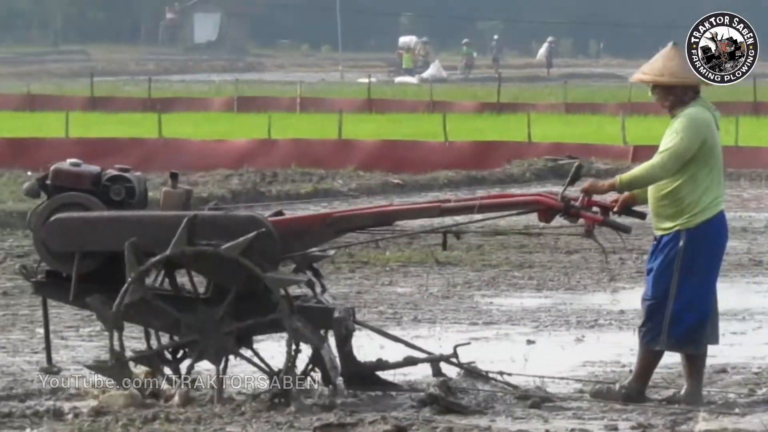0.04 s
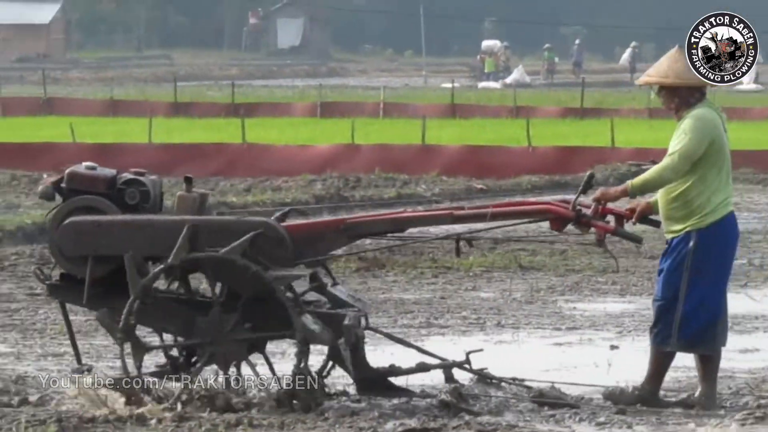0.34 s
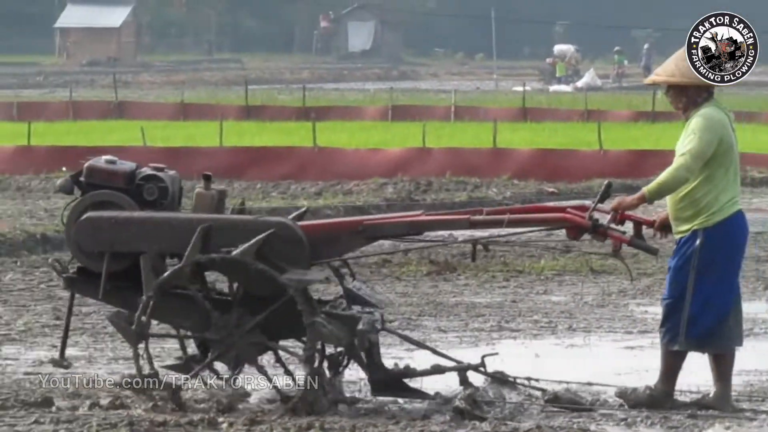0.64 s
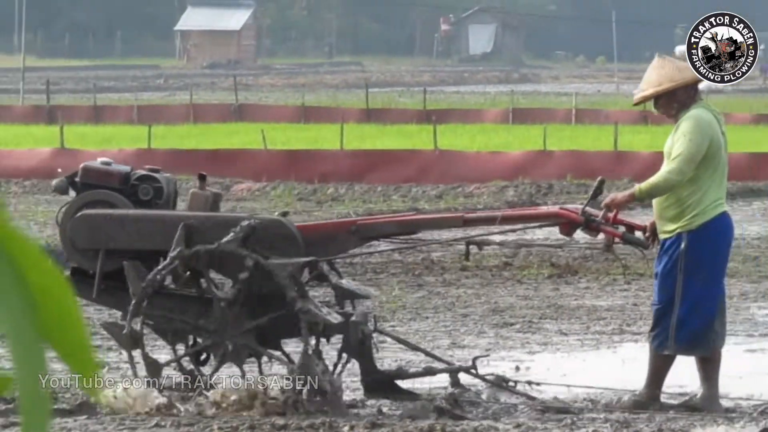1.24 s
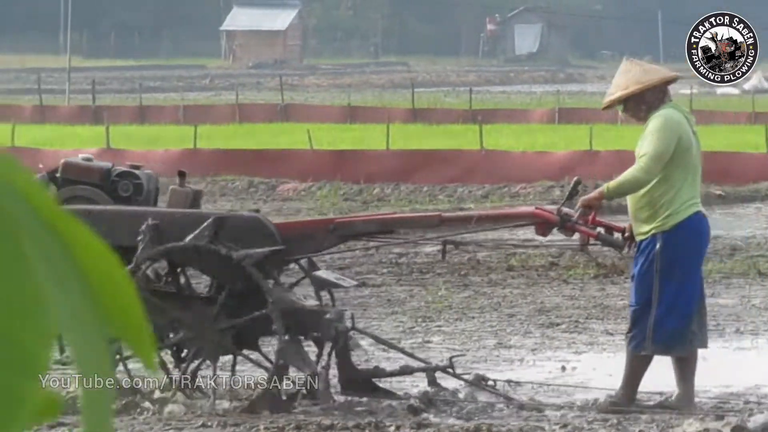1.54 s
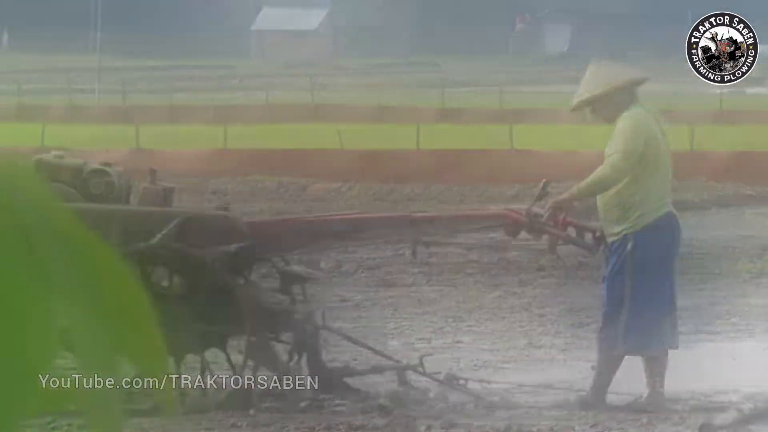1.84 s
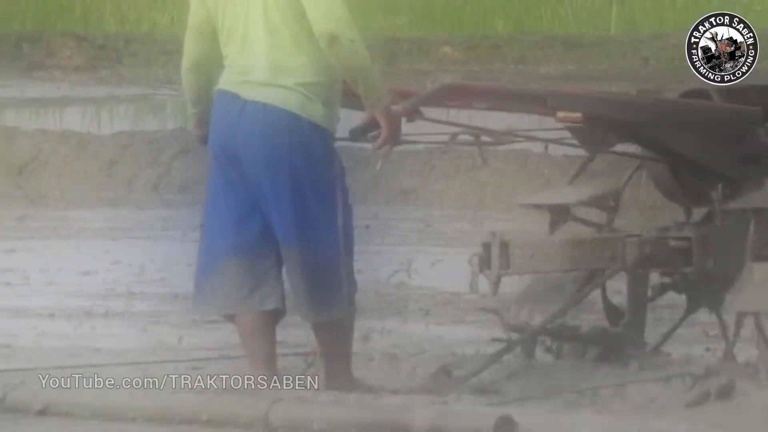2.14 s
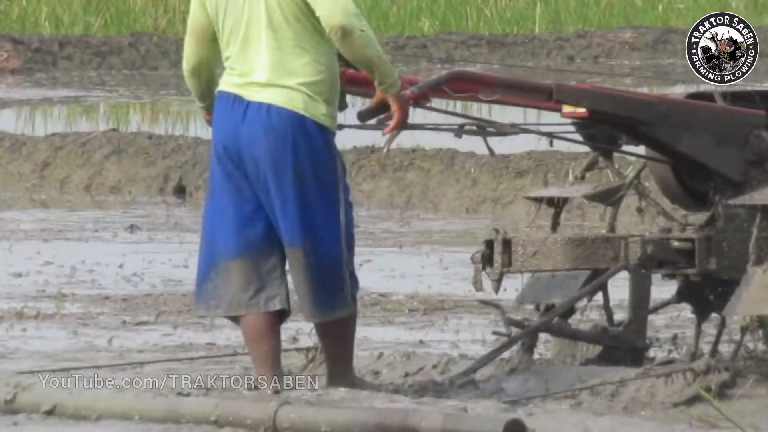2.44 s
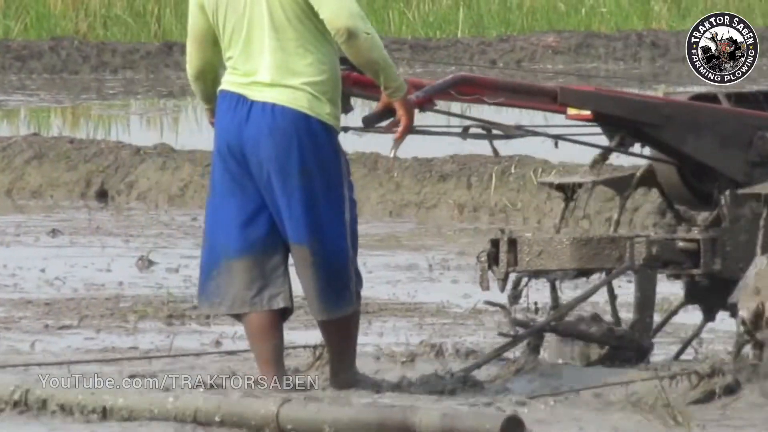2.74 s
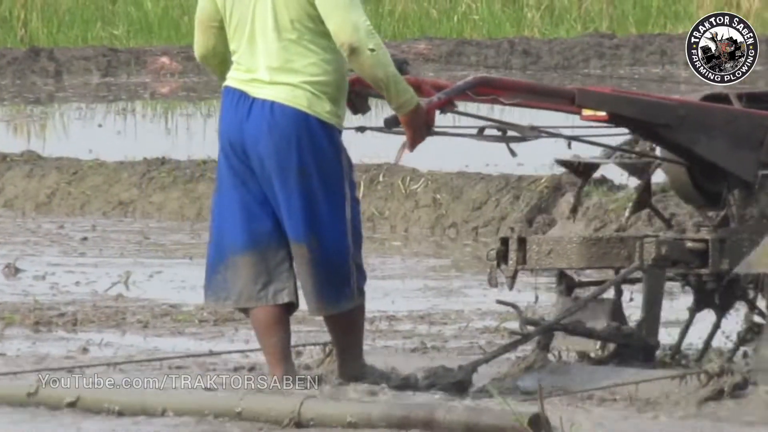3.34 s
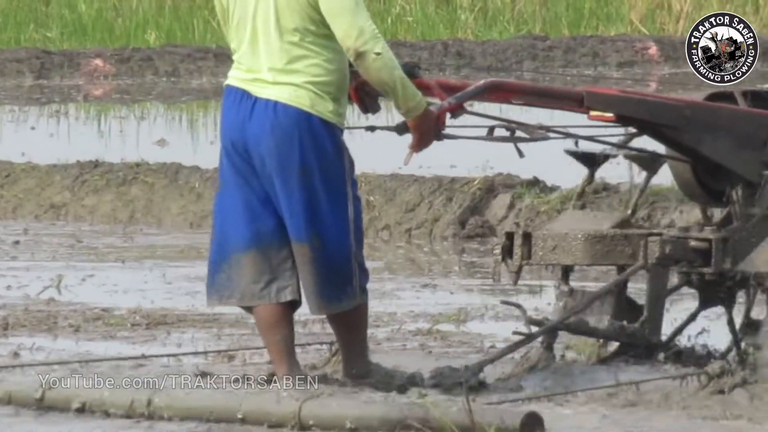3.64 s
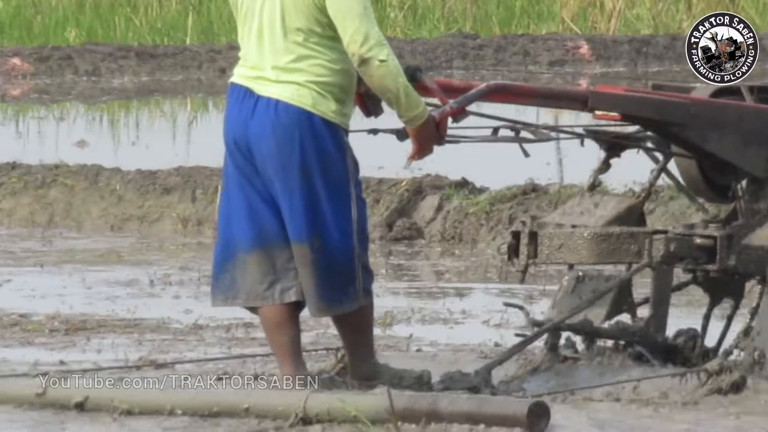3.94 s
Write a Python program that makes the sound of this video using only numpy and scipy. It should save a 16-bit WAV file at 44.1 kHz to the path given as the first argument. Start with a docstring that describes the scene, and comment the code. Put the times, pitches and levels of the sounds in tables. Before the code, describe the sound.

A single-cylinder diesel walking tractor chugs and rattles in a wet field while a motorbike fades away. After a short silence it resumes, heard from behind, with faint mud spatters, metal ticks and another motorbike approaching far off.

```python
"""Flooded field: a single-cylinder diesel walking tractor ploughs, heard from the side, then from behind
after a short silence. Each engine cycle brings the same exhaust thumps and metal knocks over rattling
gears; from behind, mud spatters off the wheels and metal ticks. A faster engine, probably a motorbike,
recedes at the start; another draws near at the end."""
import sys
import numpy as np
from scipy import signal
from scipy.fft import rfft, irfft
from scipy.io import wavfile
from scipy.ndimage import uniform_filter1d

SR = 44100
rng = np.random.default_rng(int(sys.argv[2]) if len(sys.argv) > 2 else 0)


def generate_wav(signal):
    """Clip the signal to [-1, 1] and save it as 16-bit WAV at the path in sys.argv[1]."""
    frames = np.transpose(np.atleast_2d(signal))
    scaled = np.clip(frames, -1, 1) * 32767
    pcm = np.round(scaled).astype(np.int16)
    wavfile.write(sys.argv[1], SR, pcm)


N = 176400

FIRING_HZ = 11.93
KNOCK_RISE_MS, PUFF_RISE_MS = .3, 1.2
# engine block spectrum from behind (frequency [Hz], gain [dB])
REAR_BLOCK_SPECTRUM = [(100, -15), (400, 2.5), (670, 11.5), (800, 8.5), (1320, 2), (1700, -15.5),
                       (2400, -4.5), (2520, 3), (2750, -2), (3050, -2.5), (3280, -2.5), (3550, 0),
                       (4250, -10.5), (4600, -2.5), (5550, -14), (6050, -11), (7000, -20.5), (10500, -18),
                       (15000, -38)]


def undb(db):
    return 10 ** (np.asarray(db) / 20)


def unit(x):
    """Scale to rms 1."""
    return x / np.sqrt(np.mean(x ** 2) + 1e-18)


def curves(table):
    """Each value column of a time table, per sample."""
    rows = np.array(table, float)
    return [np.interp(np.arange(N) / SR, rows[:, 0], col) for col in rows.T[1:]]


def noise():
    return rng.standard_normal(N)


def walk(rate_hz):
    """Random steps at rate_hz, smoothed twice; rms 1."""
    hold = max(int(SR / rate_hz), 2)
    steps = np.repeat(noise()[:N // hold + 1], hold)
    return unit(uniform_filter1d(uniform_filter1d(steps, hold), hold)[:N])


def colour(x, spectrum):
    """Minimum-phase filter through (frequency [Hz], gain [dB]) points; rms 1."""
    hz, db = np.array(spectrum, float).T
    size = 2 * N
    bins_hz = np.maximum(np.arange(N + 1) * SR / size, 1)
    gain = undb(np.interp(np.log(bins_hz), np.log(hz), db))
    cepstrum = irfft(np.log(gain))
    cepstrum[1:N] *= 2
    cepstrum[N + 1:] = 0
    return unit(irfft(rfft(x, size) * np.exp(rfft(cepstrum)))[:N])


def resonance(hz, width_hz):
    """Noise band with a gliding centre; rms 1."""
    lowpass = signal.butter(2, width_hz / 2, fs=SR, output="sos")
    baseband = signal.sosfilt(lowpass, noise() + 1j * noise())
    return unit((baseband * np.exp(2j * np.pi * np.cumsum(hz) / SR)).real)


def partials(turns, orders, waver_db, waver_hz, smear_rad):
    """Multiples of a shaft rate, each wavering in level and phase; rms 1."""
    out = 0
    for order, db in orders:
        gain = undb(db + waver_db * walk(waver_hz))
        drift_rad = smear_rad * np.sqrt(order) * walk(waver_hz)
        out = out - gain * np.cos(2 * np.pi * order * turns + drift_rad)
    return unit(out)


def impulses(times_s, sizes):
    """One impulse at each time."""
    out, at = np.zeros(N), np.round(times_s * SR).astype(int)
    inside = (at >= 0) & (at < N)
    np.add.at(out, at[inside], sizes[inside])
    return out


def bursts(hits, rise_ms, decay_ms):
    """Power envelope: quick rise, exponential decay after each hit."""
    ms = np.arange(SR // 10) / SR * 1000
    shape = (1 - np.exp(-ms / rise_ms)) * np.exp(-ms / decay_ms)
    return np.maximum(signal.fftconvolve(hits ** 2, shape ** 2)[:N], 0)


def envelope(trains, rise_ms):
    """Amplitude envelope of (impulse train, decay [ms]) pairs, summed in power."""
    return np.sqrt(sum(bursts(hits, rise_ms, decay_ms) for hits, decay_ms in trains))


def single_hits(events):
    """One (impulse train, decay [ms]) pair per event."""
    return [(impulses(np.array([s]), undb([db])), decay_ms) for s, db, decay_ms in events]


def hum(hz=75.5):
    """Low hum, swelling and sinking under the chug."""
    # swells (time [s], level [dB])
    swells = [(2.18, -44), (2.6, -40.5), (2.8, -48), (3.02, -39), (3.13, -31.5), (3.2, -47), (3.29, -30.5),
              (3.5, -42), (3.7, -48), (4, -37)]
    db, = curves(swells)
    return undb(db) * partials(hz * np.arange(N) / SR, [(1, 0)], waver_db=0, waver_hz=14, smear_rad=.6)


def approaching_bike():
    """Distant exhaust note that swells and firms into a drone on its fourth order."""
    # approach (time [s], firing rate [Hz], note [dB], drone [dB])
    course = [(2.18, 65.05, -53, -60), (2.8, 65.34, -49.5, -56), (3.33, 65.6, -39, -51),
              (3.46, 65.9, -40.5, -33), (3.69, 66.12, -43, -32), (3.77, 66.1, -40.5, -41),
              (3.88, 66.1, -38, -42), (4, 66.8, -41, -30)]
    # exhaust harmonics (order, relative level [dB])
    orders = [(1, -6), (5, -1), (6, -14), (7, -7.5), (8, -2.5), (10, -4), (11, -12)]
    firing_hz, note_db, drone_db = curves(course)
    turns = np.cumsum(firing_hz) / SR
    note = partials(turns, orders, waver_db=2, waver_hz=8, smear_rad=.12)
    drone = partials(turns, [(4, 0)], waver_db=.7, waver_hz=8, smear_rad=.06)
    return undb(note_db) * note + undb(drone_db) * drone


def chain():
    """Whir and scrape, perhaps the receding bike's chain, swelling briefly and sinking in pitch."""
    # whir (time [s], pitch [Hz], level [dB])
    whir_course = [(0, 2926, -35), (.28, 2920, -36), (.39, 2890, -32.5), (.55, 2880, -33),
                   (.69, 2876, -34.5), (.78, 2855, -43), (.95, 2890, -50.5), (1.2, 2854, -70)]
    # whir resonances (ratio to pitch, width [Hz], relative level [dB])
    modes = [(1, 120, 2), (2.52, 700, -16), (3.16, 700, -13), (3.5, 900, -13.5)]
    # scrape (time [s], centre [Hz], level [dB])
    scrape_course = [(0, 5000, -41), (.25, 5120, -47.5), (.4, 5020, -38.5), (.55, 4850, -39.5),
                     (.69, 4590, -38), (.8, 4421, -44), (.95, 4380, -54), (1.2, 4400, -72)]
    whir_hz, whir_db = curves(whir_course)
    scrape_hz, scrape_db = curves(scrape_course)
    whir = unit(sum(undb(db) * resonance(ratio * whir_hz, width_hz) for ratio, width_hz, db in modes))
    return undb(whir_db) * whir + undb(scrape_db) * resonance(scrape_hz, width_hz=1000)


def receding_bike(pulsing_db=1.5):
    """Exhaust note, roar pulsing with each crank turn, tyre hiss and gear whine, all fading away."""
    # retreat (time [s], firing rate [Hz], note [dB], roar [dB], hiss [dB])
    course = [(0, 60.76, -16, -19.5, -31.5), (.12, 60.25, -18.5, -20, -32.5),
              (.225, 60.28, -19.5, -20.5, -27.5), (.36, 59.7, -21, -24, -34), (.5, 59.7, -21.5, -24.5, -35),
              (.75, 59.48, -24, -29, -38), (1.05, 59.71, -28.5, -33, -46), (1.5, 59.38, -32, -35, -50.5),
              (1.97, 59.88, -33, -42, -53)]
    # gear whine (time [s], pitch [Hz], level [dB])
    whine_course = [(0, 2294, -30.5), (.12, 2272, -33), (.17, 2270, -44), (.43, 2250, -44), (.5, 2246, -35),
                    (.67, 2238, -37), (.72, 2237, -33), (.82, 2236, -34), (.885, 2235, -29),
                    (.96, 2235, -34), (1.01, 2234, -46), (1.07, 2234, -33), (1.36, 2235, -36),
                    (1.47, 2230, -34.5), (1.73, 2236, -38), (1.8, 2240, -49), (1.97, 2240, -56)]
    # exhaust and gear partials (ratio to pitch, relative level [dB])
    note_orders = [(1, -6.5), (2, 2.5), (3, -6), (4, 1), (5, -8), (6, -3.5), (7, -8.5), (8, -13), (9, -5),
                   (11, -10.5), (12, -7.5), (13, -20.5), (14, -9.5), (16, -11.5), (18, -10.5), (20, -19),
                   (22, -13.5), (23, -10), (25, -9), (26, -11.5), (27, -10.5)]
    whine_orders = [(1, 0), (1.279, -17), (.72, -17), (.372, -12)]
    # noise spectra (frequency [Hz], gain [dB])
    roar_spectrum = [(30, -38), (70, -0.5), (200, -6), (400, -3), (700, 0), (1100, 2), (1350, -2),
                     (1700, -1), (2500, -8.5), (3500, -16), (5000, -20.5), (15000, -60.5)]
    tyre_spectrum = [(500, -13.5), (1500, -15), (2400, -4), (2900, -2), (3400, 3), (5000, -4), (6200, -5),
                     (7200, -3.5), (8400, -5), (10000, -7), (12500, -12.5), (15000, -24.5)]
    firing_hz, note_db, roar_db, hiss_db = curves(course)
    whine_hz, whine_db = curves(whine_course)
    cycles = np.cumsum(firing_hz * (1 + .00206 * walk(25))) / SR
    crank_turns = 2 * cycles
    note = partials(cycles, note_orders, waver_db=1.4, waver_hz=11.96, smear_rad=.25)
    roar = colour(noise() * undb(pulsing_db * np.cos(2 * np.pi * crank_turns)), roar_spectrum)
    whine = partials(np.cumsum(whine_hz) / SR, whine_orders, waver_db=1, waver_hz=35, smear_rad=.4)
    hiss = colour(noise(), tyre_spectrum)
    return undb(note_db) * note + undb(roar_db) * roar + undb(hiss_db) * hiss + undb(whine_db) * whine


def thud():
    """Lone dull thud."""
    # impact (time [s], gain [dB], decay [ms])
    events = [(1.46, -11.5, 10.3)]
    # thud spectrum (frequency [Hz], gain [dB])
    spectrum = [(30, -27.5), (80, -11), (160, -0.5), (220, 1.5), (340, -36), (2000, -67)]
    return envelope(single_hits(events), PUFF_RISE_MS) * colour(noise(), spectrum)


def mud(rms_db=-52.5):
    """Short, grainy spatters of wet mud flung off the wheels."""
    # spatters (time [s], relative level [dB])
    events = [(2.322, 0.5), (2.448, -1.5), (2.698, -0.5), (2.812, 1), (3.056, 1), (3.18, 0), (3.303, 3),
              (3.428, 1), (3.548, 3), (3.671, 3), (3.793, -2), (3.915, 0)]
    # spatter spectrum (frequency [Hz], gain [dB])
    spectrum = [(500, -5), (2000, 7), (4500, 6), (6200, 0), (8500, -5), (11000, -8), (15000, -31)]
    times_s, db = np.array(events).T
    power = bursts(impulses(times_s, undb(db)), rise_ms=3.3, decay_ms=11.4)
    grains = np.sqrt(power) * noise() * undb(1.6 * walk(900))
    return undb(rms_db) * colour(grains, spectrum)


def ticks(rms_db=-50.5):
    """Crisp metal ticks, probably from the loose hitch."""
    # ticks (time [s], relative level [dB], decay [ms])
    events = [(2.371, -3.5, 3.5), (2.790, 0.5, 3), (3.125, 1, 2.5), (3.426, 3, 3.4), (3.542, 0, 2.8),
              (3.549, 1, 4), (3.711, 2.5, 4.6), (3.794, 6, 3.8), (3.859, 1, 5.6)]
    # tick spectrum (frequency [Hz], gain [dB])
    spectrum = [(500, -7), (1500, -7), (2300, 2.5), (2950, 4), (3800, 2), (5000, -4), (6500, -9),
                (9000, -17), (15000, -32)]
    return undb(rms_db) * colour(envelope(single_hits(events), KNOCK_RISE_MS) * noise(), spectrum)


def casing(drive):
    """Metal engine casing ringing in damped modes; rms 1."""
    # modes (frequency [Hz], relative level [dB], T60 [ms])
    modes = [(2400, -6.5, 24), (2813, -0.5, 42), (2967, -3, 28), (3062, 1, 24), (3400, -8, 22),
             (4550, -16, 16), (6060, -19, 18)]
    out = 0
    for hz, db, t60_ms in modes:
        pole = np.exp(2j * np.pi * hz / SR - np.log(1000) * 1000 / (t60_ms * SR))
        out = out + undb(db) * signal.lfilter([1], [1, -pole], drive).imag
    return unit(out)


def clatter_blip(start_s=2.171, decay_s=.005, gain_db=-36):
    """Brief metallic scrap of engine clatter just before the silence ends."""
    age_s = np.arange(N) / SR - start_s
    clatter = colour(noise(), REAR_BLOCK_SPECTRUM) + 1.2 * casing(noise())
    return undb(gain_db) * (age_s > 0) * np.exp(-np.abs(age_s) / decay_s) * clatter


def strokes(start_s, offset_ms, db, scatter_db, jitter_ms=.4):
    """One impulse per engine cycle, slightly uneven in time and strength."""
    # crank lag as the governor hunts (time [s], lag [ms])
    crank_lag = [(0, 2.5), (.6, -1.3), (.95, -2.5), (1.25, 0.1), (1.9, 2), (2.2, -1.2), (2.65, 0.97),
                 (3.25, 0.03), (3.6, 0.5), (4, -3)]
    cycles_s = start_s + np.arange(-30, 50) / FIRING_HZ
    jitter, scatter = rng.standard_normal((len(cycles_s), 2)).T
    late_ms = offset_ms + np.interp(cycles_s, *np.array(crank_lag).T) + jitter_ms * jitter
    return impulses(cycles_s + late_ms / 1000, undb(db + scatter_db * scatter))


def exhaust(start_s, thumps, spectrum, gas_db):
    """Pressure thumps, each with a puff of gas; rms 1."""
    trains = [(strokes(start_s, ms, db, scatter_db=.1), decay_ms) for ms, db, decay_ms in thumps]
    gas = unit(envelope(trains, PUFF_RISE_MS) * noise())
    pressure = unit(sum(hits for hits, _ in trains))
    return colour(undb(gas_db) * gas - pressure, spectrum)


def knocking(start_s, knocks, spectrum, ring_db):
    """Combustion knock, piston slap and valves crack in the block and ring the casing."""
    trains = [(strokes(start_s, ms, db, scatter_db=.7), decay_ms) for ms, db, decay_ms in knocks]
    crack = envelope(trains, KNOCK_RISE_MS) * noise()
    blows = unit(sum(hits for hits, _ in trains))
    return colour(crack, spectrum) + undb(ring_db) * casing(blows + unit(crack) / 2)


def gears(spectrum, flutter_db):
    """Gear rattle: noise with a fast level flutter; rms 1."""
    return colour(noise() * undb(flutter_db * walk(300)), spectrum)


def tractor_side(start_s=0):
    """Exhaust, knocks and gears from the side."""
    # strokes per cycle (offset [ms], relative level [dB], decay [ms])
    thumps = [(14.9, -3, 3.3), (28.75, -4, 3.2), (38, -10, 4), (63.3, -8, 1.4), (79.6, -5, 4)]
    knocks = [(13, 0, 5), (29.6, 0, 3.4), (57, -12, 6)]
    # spectra (frequency [Hz], gain [dB])
    exhaust_spectrum = [(20, -36), (30, -17), (38, -4), (55, -4), (80, 4.5), (130, -1.5), (200, -7),
                        (300, -9.5), (450, -13), (1000, -34), (4000, -73)]
    block_spectrum = [(100, -21.5), (400, -8.5), (800, 2), (1200, -6.5), (1600, 0.5), (2400, 2), (2900, 2),
                      (3400, -9.5), (4200, -10.5), (7000, -21), (10500, -21), (15000, -40.5)]
    gear_spectrum = [(18, -42), (30, -25), (87, -2), (240, -3), (319, -13), (812, -11.5), (1300, -23),
                     (1520, -24.5), (2020, -18.5), (2240, -15), (2480, -27), (2900, -20.5), (3570, -25.5),
                     (9830, -38.5), (14900, -54.5)]
    # mix (time [s], exhaust [dB], knocks [dB], gears [dB])
    levels = [(0, -34, -42, -27.5), (.8, -30, -41, -26.5), (1.1, -26, -40, -26.5), (1.5, -26, -38.5, -28.3),
              (1.97, -30, -39, -27.5)]
    exhaust_db, knock_db, gear_db = curves(levels)
    return (undb(exhaust_db) * exhaust(start_s, thumps, exhaust_spectrum, gas_db=-2)
            + undb(knock_db) * knocking(start_s, knocks, block_spectrum, ring_db=-4)
            + undb(gear_db) * gears(gear_spectrum, flutter_db=1.4))


def tractor_rear(start_s=2.2):
    """Exhaust, knocks and gears from behind."""
    # strokes per cycle (offset [ms], relative level [dB], decay [ms])
    thumps = [(-0.5, 4, 5.4), (7, -3.5, 3.8), (27, 1, 12), (49, 2.5, 5.9), (56.5, -6.5, 3.2),
              (65, -9.5, 5.4)]
    knocks = [(2, -1, 5), (7.5, -5, 4), (24, -7, 6.5), (65.6, 2.2, 4.2), (70.8, -1.8, 3.4)]
    # spectra (frequency [Hz], gain [dB])
    exhaust_spectrum = [(20, -39), (40, -32), (55, -12), (75, -1), (100, -15), (175, -1.5), (280, -4.5),
                        (340, -11.5), (430, -21.5), (1000, -31), (4000, -67)]
    gear_spectrum = [(18, -51), (30, -24), (64, -4), (80, -2), (102, -7), (234, -10.5), (266, -6.5),
                     (424, -17.5), (522, -14), (580, -17.5), (643, -10), (771, -13), (1370, -15),
                     (1680, -20), (3570, -24), (9830, -41), (14900, -51)]
    # mix (time [s], exhaust [dB], knocks [dB], gears [dB])
    levels = [(2.18, -38, -43, -38.5), (2.6, -36.5, -43.5, -34.5), (3, -34.5, -40.5, -33.5),
              (3.35, -32.5, -41, -31.5), (4, -33, -40.5, -30)]
    exhaust_db, knock_db, gear_db = curves(levels)
    return (undb(exhaust_db) * exhaust(start_s, thumps, exhaust_spectrum, gas_db=-4)
            + undb(knock_db) * knocking(start_s, knocks, REAR_BLOCK_SPECTRUM, ring_db=-5)
            + undb(gear_db) * gears(gear_spectrum, flutter_db=.86))


def scene():
    """From the side, a short silence, then from behind; mono."""
    side_end_s, rear_start_s, fade_s = 1.965, 2.185, .003
    t = np.arange(N) / SR
    side, rear = tractor_side(), tractor_rear()
    side += receding_bike() + chain() + thud()
    rear += approaching_bike() + hum() + mud() + ticks()
    side_gate = np.clip((side_end_s - t) / fade_s, 0, 1)
    rear_gate = np.clip((t - rear_start_s) / fade_s, 0, 1)
    return (side_gate * side + rear_gate * rear + clatter_blip())[None]


def record(dry):
    """Narrow treble notch, then a steep low-pass."""
    notch_hz, width_hz, top_hz = 7865, 260, 15000
    notched = signal.lfilter(*signal.iirnotch(notch_hz, notch_hz / width_hz, fs=SR), dry)
    return signal.sosfilt(signal.ellip(10, .2, 80, top_hz, fs=SR, output="sos"), notched)


dry = scene()
out = record(dry)
generate_wav(out)
```